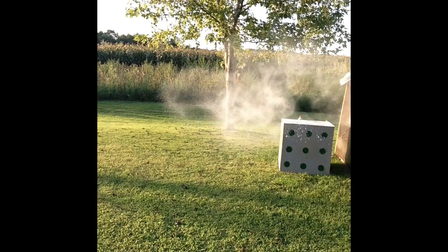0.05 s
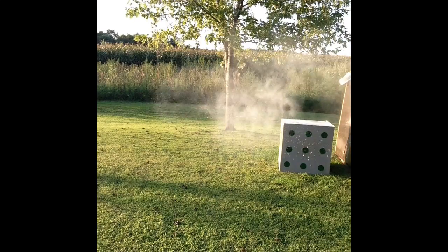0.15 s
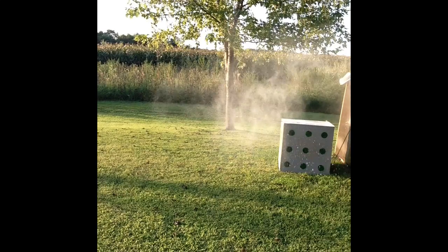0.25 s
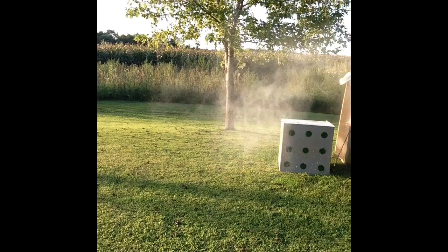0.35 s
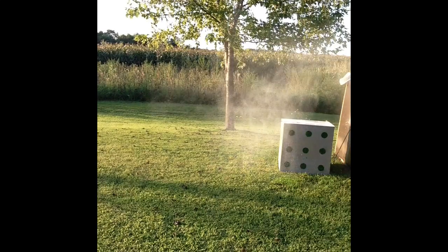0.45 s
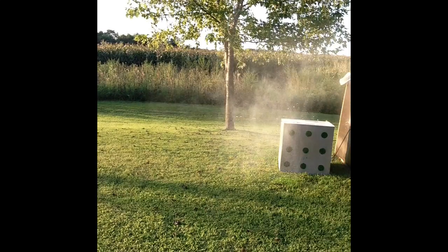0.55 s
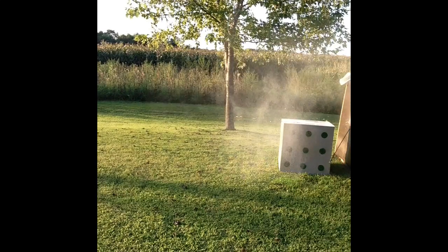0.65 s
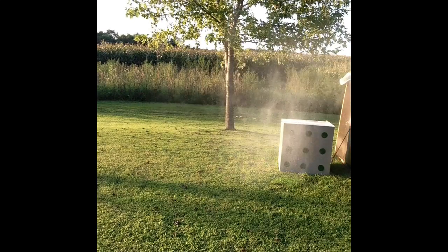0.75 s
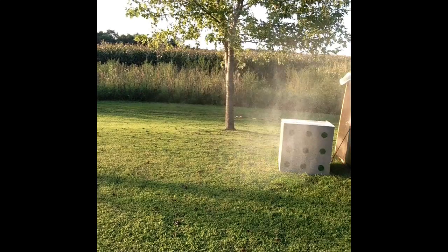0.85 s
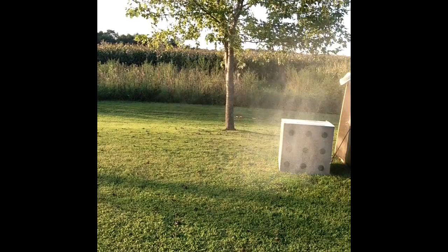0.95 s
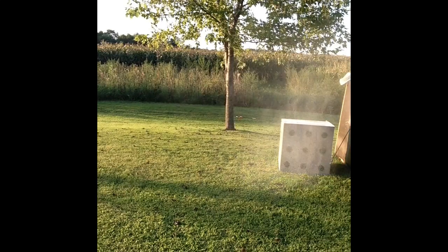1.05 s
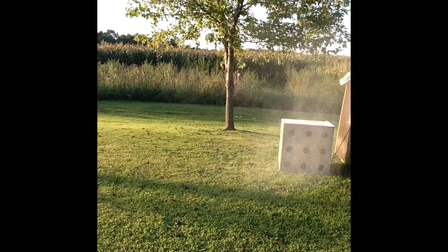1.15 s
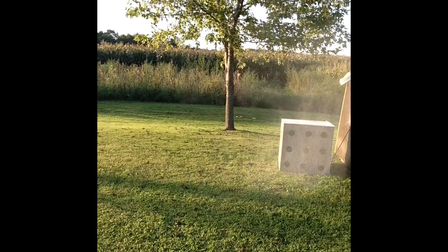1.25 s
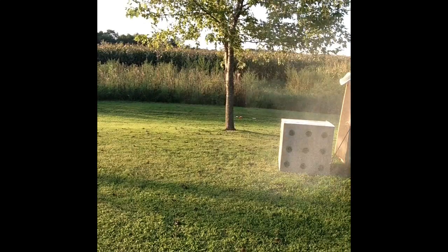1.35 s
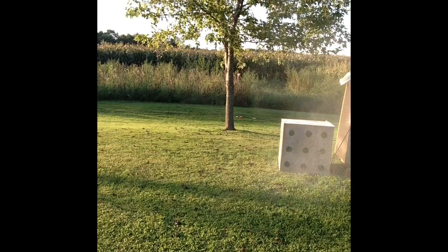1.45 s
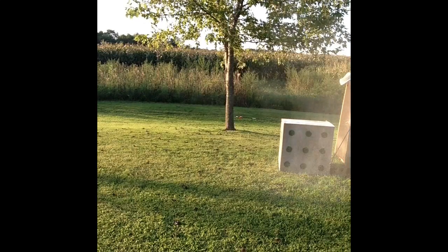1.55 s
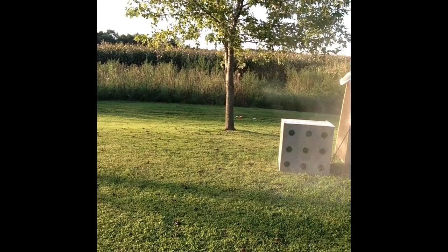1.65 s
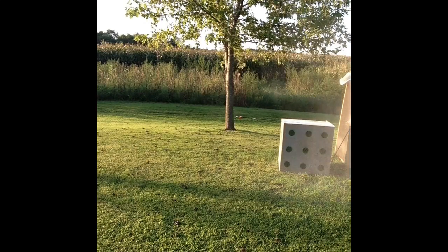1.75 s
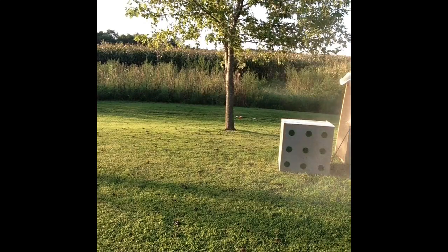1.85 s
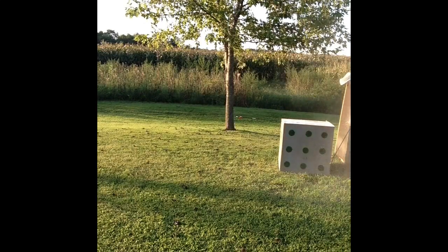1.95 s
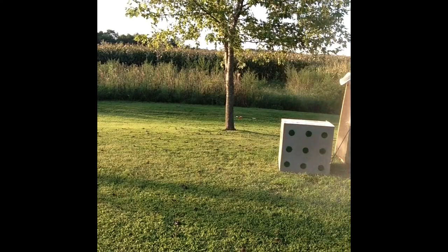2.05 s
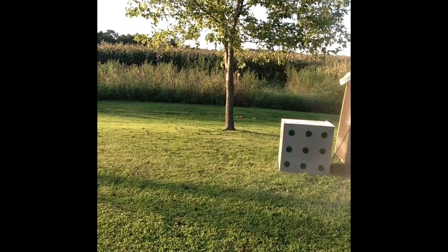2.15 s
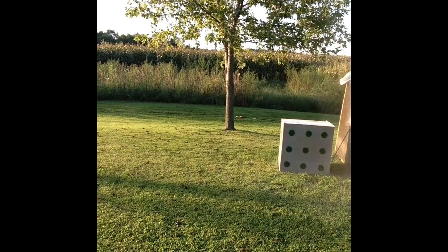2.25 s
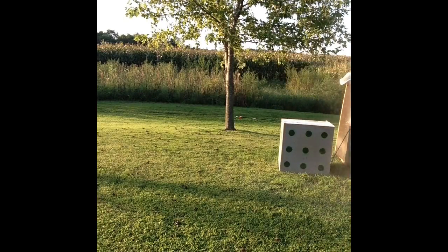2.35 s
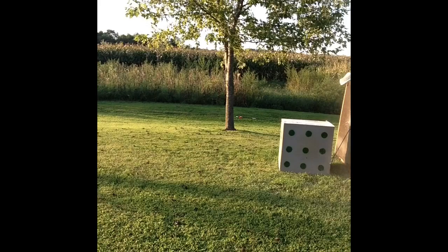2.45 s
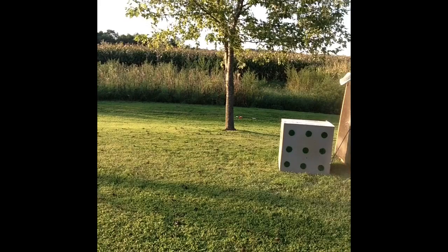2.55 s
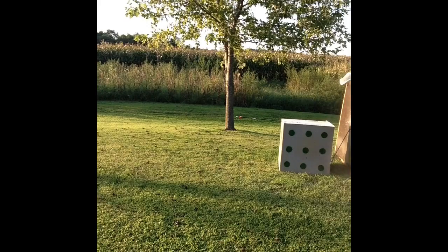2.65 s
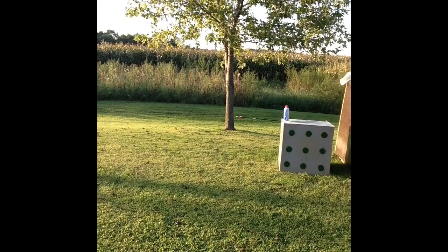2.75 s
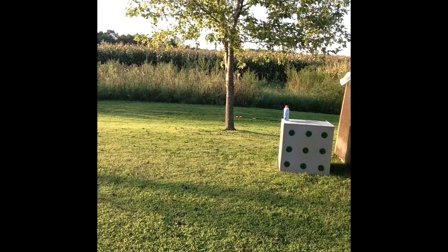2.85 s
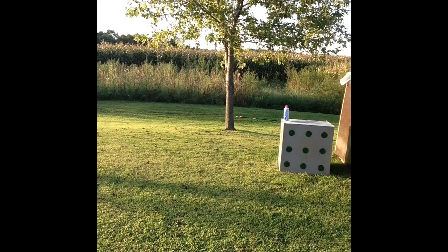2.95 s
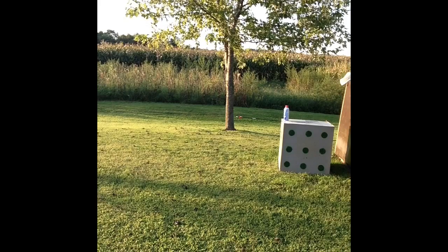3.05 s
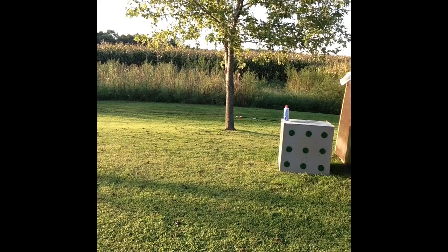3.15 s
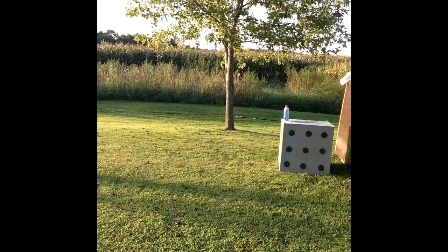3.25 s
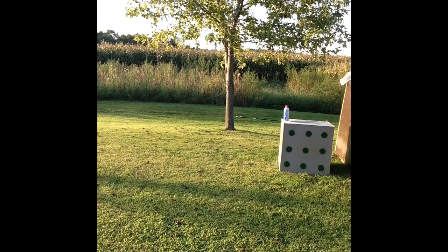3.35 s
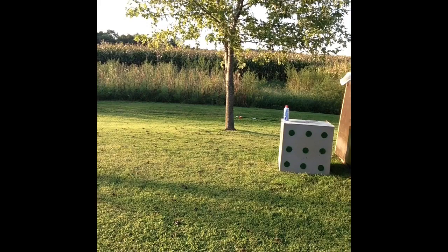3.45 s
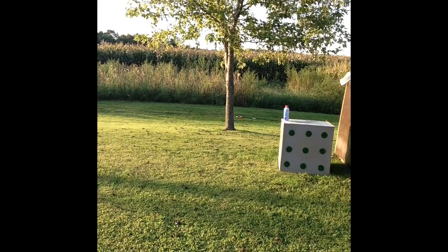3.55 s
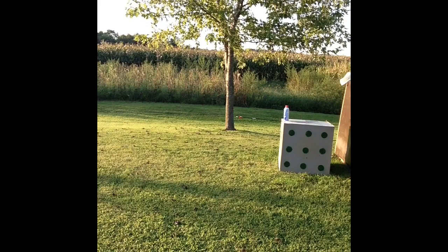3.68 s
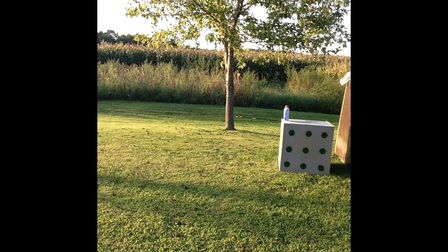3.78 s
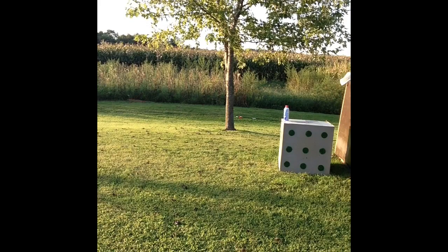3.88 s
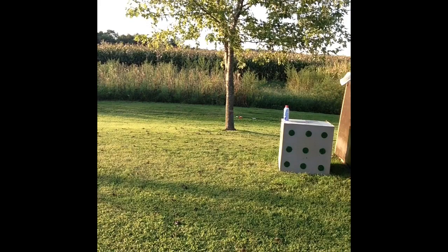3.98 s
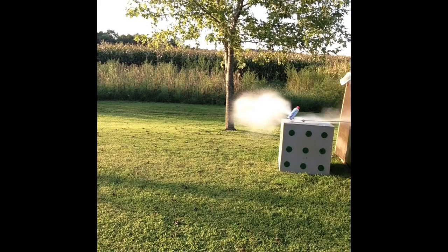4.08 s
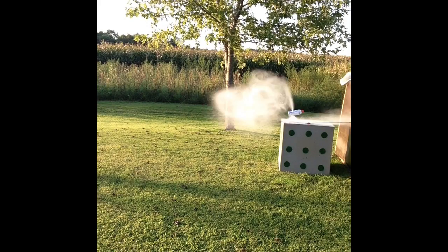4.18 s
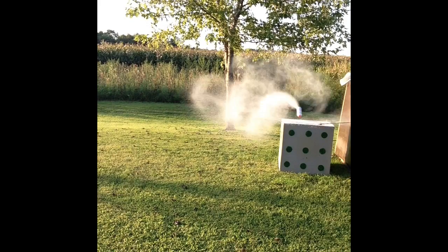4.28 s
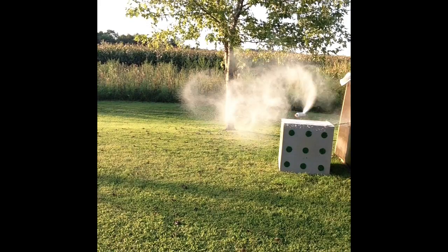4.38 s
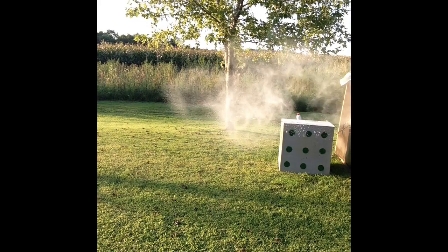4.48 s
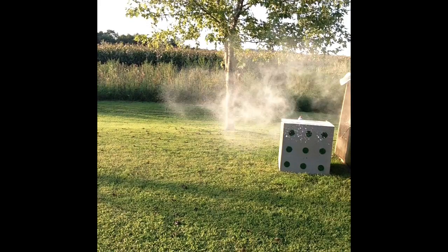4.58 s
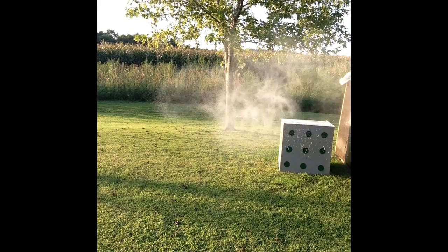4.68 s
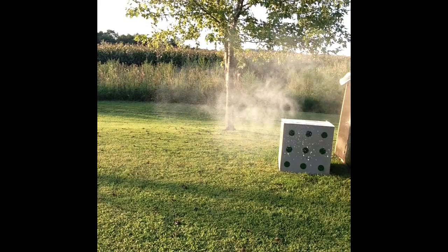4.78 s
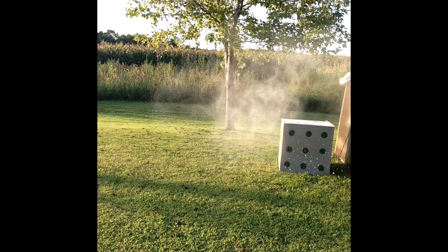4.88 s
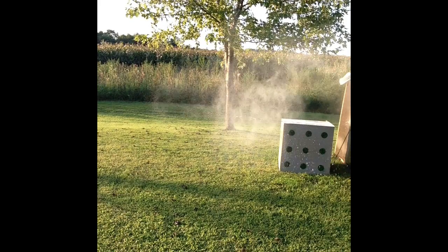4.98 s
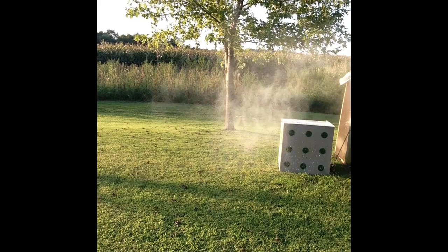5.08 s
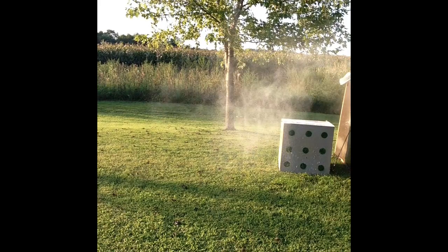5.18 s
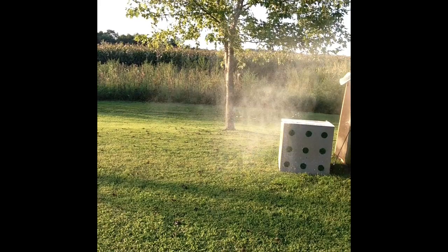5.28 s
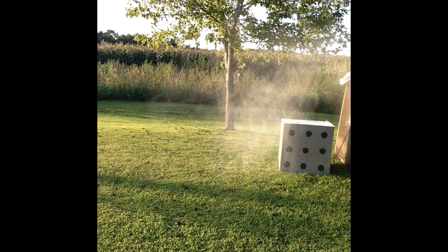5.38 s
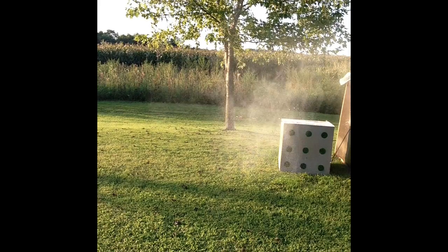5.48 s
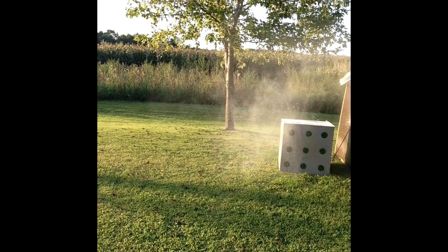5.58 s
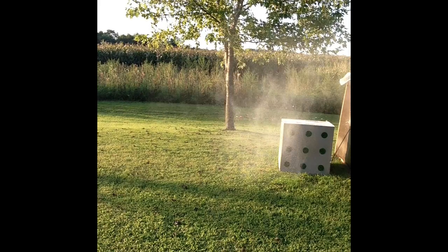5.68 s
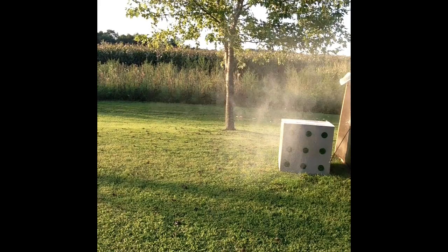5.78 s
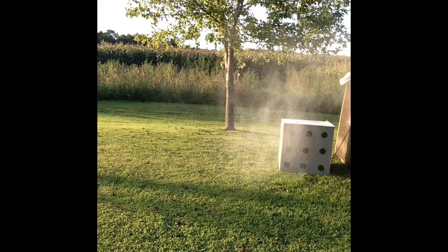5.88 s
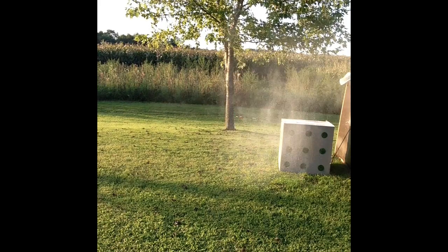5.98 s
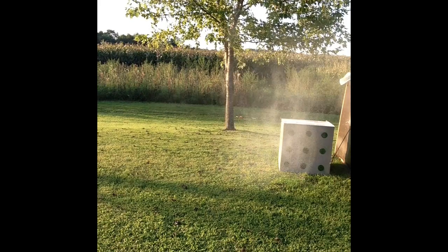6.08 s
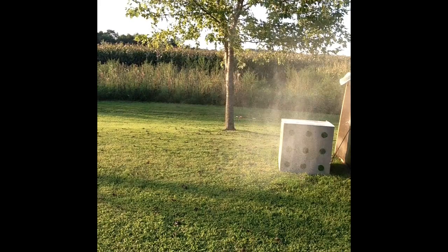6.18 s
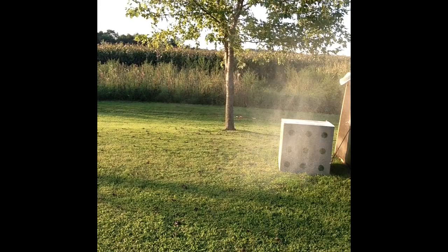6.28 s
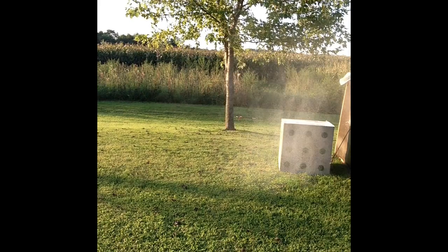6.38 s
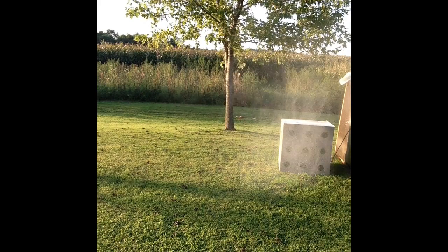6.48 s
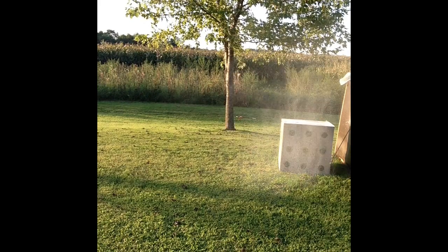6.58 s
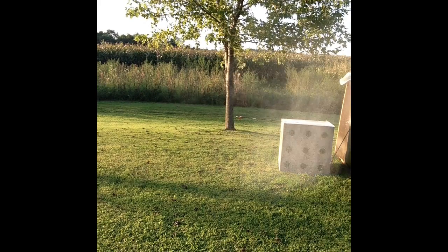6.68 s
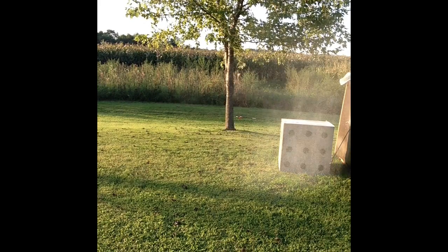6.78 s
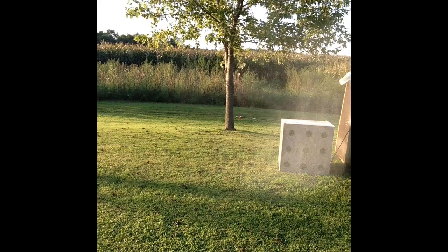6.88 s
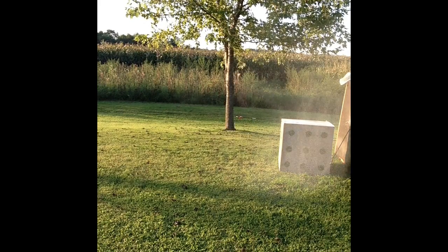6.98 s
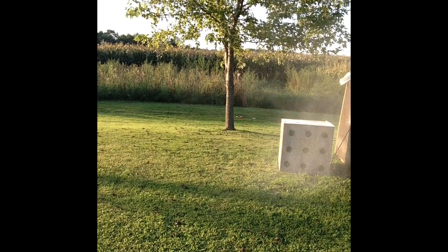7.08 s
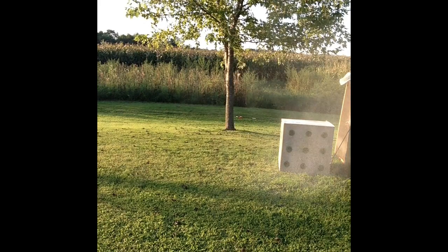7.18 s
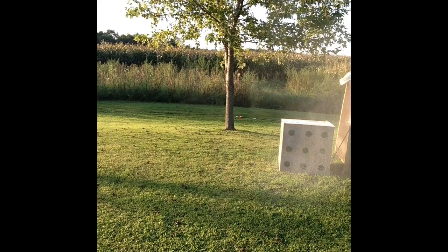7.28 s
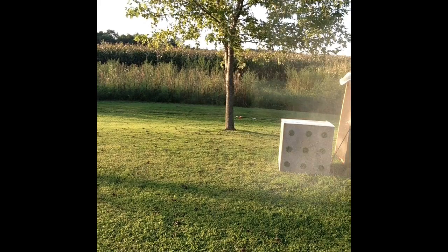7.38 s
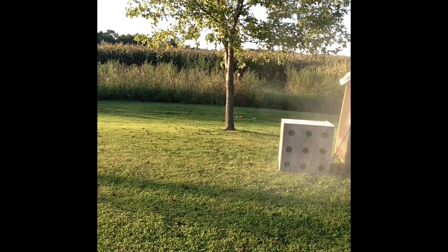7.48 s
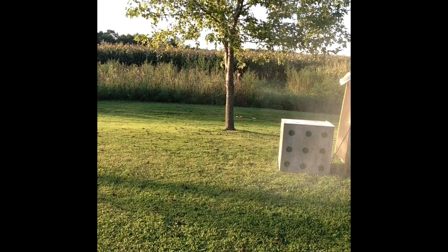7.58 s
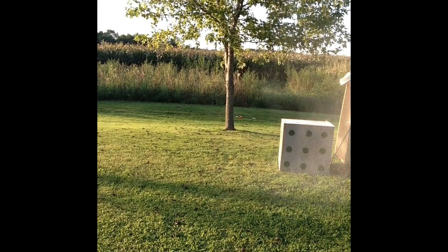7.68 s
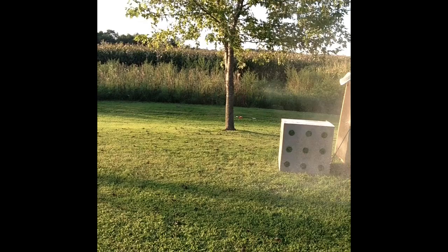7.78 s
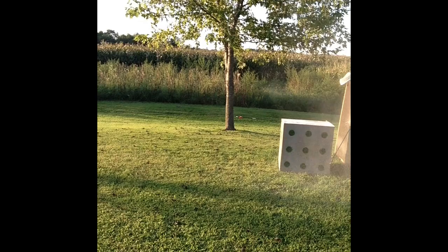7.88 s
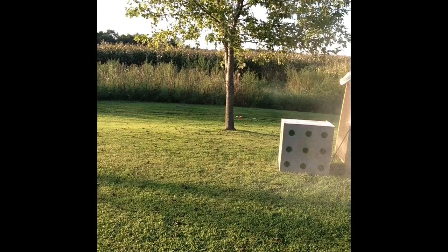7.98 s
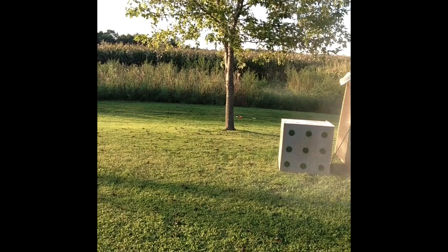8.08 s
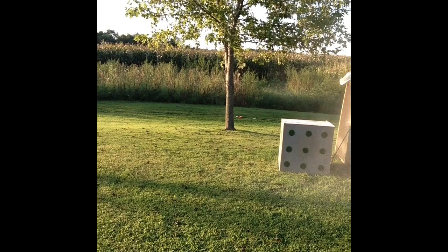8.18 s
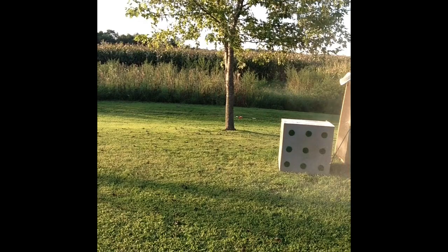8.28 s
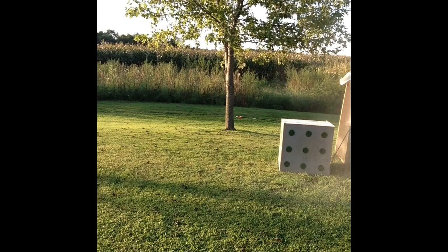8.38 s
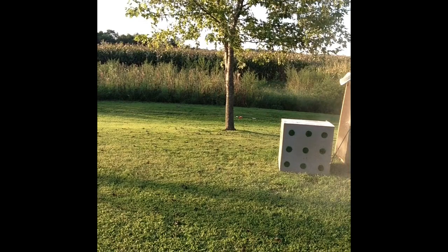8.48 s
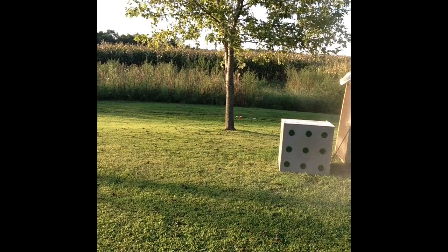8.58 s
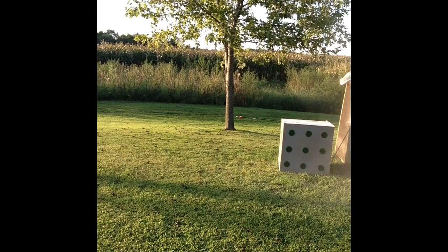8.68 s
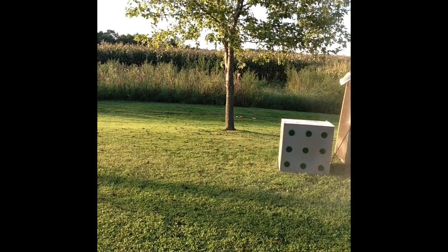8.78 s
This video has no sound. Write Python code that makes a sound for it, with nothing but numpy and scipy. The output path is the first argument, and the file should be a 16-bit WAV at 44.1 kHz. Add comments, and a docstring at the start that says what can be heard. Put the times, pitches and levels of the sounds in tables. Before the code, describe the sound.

Crickets chirr while gas hisses out; after a brief gap, a slowed bow twang ends in a violent metallic bang, rushing gas and soft can knocks.

```python
"""First the dying hiss of a burst pressure can is heard at natural speed, among crickets in a yard.
Then the whole shot plays at half speed: the bow snaps, the arrow hits, gas roars out and the can tumbles.
Hiss, air and insects are filtered noise; crickets, bird and bow are tones; struck things are fading rings.
All times and pitches below are those of the half-speed playing, on the clock of the whole yard.
"""
import sys
import numpy as np
from scipy import signal
from scipy.fft import rfft, irfft
from scipy.io import wavfile
from scipy.ndimage import uniform_filter1d

SR = 44100
rng = np.random.default_rng(int(sys.argv[2]) if len(sys.argv) > 2 else 0)


def boost_factor(decibels):
    """Convert a level in decibels to a linear amplitude factor."""
    exponent = np.asarray(decibels, float) / 20
    return 10 ** exponent


def store_wav(level_fs):
    """Save 16-bit WAV to argv[1]."""
    pcm = np.round(np.clip(np.atleast_2d(level_fs), -1, 1) * 32767)
    wavfile.write(sys.argv[1], SR, pcm.T.astype(np.int16))


N = 389403

LENGTH = round(10.1 * SR)  # samples of the yard
T = np.arange(LENGTH) / SR  # time in s
FIRST_BLOW_S = 4.111  # the arrow touches the can


def noise():
    """Plain white noise as long as the yard: every pitch equally strong."""
    return rng.standard_normal(LENGTH)


def evened(x):
    """Scales to rms 1, so that a level in dB can be set afterwards."""
    return x / np.sqrt(np.mean(x ** 2) + 1e-20)


def add(mix, s, sound):
    """Mixes a sound in at s seconds."""
    part = mix[round(s * SR):][:len(sound)]
    part += sound[:len(part)]


def coloured(x, points):
    """Filters x by a table of pitches and relative levels, then evens it."""
    f, db = np.transpose(points)
    hz = np.fft.rfftfreq(len(x), 1 / SR)
    curve_db = np.interp(np.log(hz + 1), np.log(f + 1), db)
    return evened(irfft(rfft(x) * boost_factor(curve_db), len(x)))


def level(rows):
    """Gain that follows a dB curve over time."""
    s, db = np.transpose(rows)
    return boost_factor(np.interp(T, s, db))


def humps(rows):
    """Gain of swells that rise to a peak and die away, added by power."""
    power = 0
    for s, db, rise, fall in rows:
        below_peak_db = np.maximum((s - T) * rise, (T - s) * fall)
        power = power + boost_factor(db - below_peak_db) ** 2
    return np.sqrt(power)


def resonate(x, hz, width):
    """A steep resonance: shift the pitch down to zero, smooth twice, shift back."""
    turn = np.exp(2j * np.pi * hz * T)
    r = np.exp(-np.pi * width / SR)
    smooth = signal.lfilter([1], np.convolve([1, -r], [1, -r]), x / turn)
    return (turn * smooth).real


def wobble(seconds):
    """Slow chance ups and downs of rms 1, from noise smoothed twice."""
    size = max(round(seconds * SR), 1)
    return evened(uniform_filter1d(uniform_filter1d(noise(), size), size))


def struck(blows, modes, ring=1):
    """A hit body sounds at its own pitches (modes); each blow rings those nearest its aim the most."""
    reach_db_per_octave = 70  # how narrowly a blow picks its modes
    rows = []
    for s, db, aim_hz in blows:
        for hz, t60 in modes:
            miss_db = reach_db_per_octave * abs(np.log2(hz / aim_hz))
            rows.append((s, db - miss_db, hz, ring * t60))
    return rows


def knocks(rows, rise):
    """Each row is a damped ring that swells for a share (rise) of its t60 and sags a little in pitch."""
    out, t = np.zeros(LENGTH), T[:SR // 2]
    for s, db, hz, t60 in rows:
        swell = np.sin(np.pi / 2 * np.minimum(t / (rise * t60), 1)) ** 2
        decay = boost_factor(db - 60 * np.maximum(t / t60 - rise, 0))
        turns = hz * (t + .03 * t60 * (1 - np.exp(-t / (0.74 * t60))))
        add(out, s, swell * decay * np.sin(2 * np.pi * turns))
    return out


# Colour of far traffic and leaves: [f/Hz, relative level/dB]
AIR_COLOUR = [(24, -42), (40, -11), (92, 0.5), (275, -6.5), (302, -6.5), (671, -10), (937, -12.5),
              (1610, -16), (1800, -15), (2340, -37), (3960, -120)]


def quiet_air():
    """Far traffic and leaves blend into a soft, low noise."""
    return boost_factor(-77) * coloured(noise(), AIR_COLOUR)


# Colour of the far cricket hiss: [f/Hz, relative level/dB]
CHORUS_COLOUR = [(1030, -64.5), (1750, -36), (1900, -19.5), (2240, -8), (2720, -8.5), (3020, -20),
                 (3750, -0.5), (3990, -7.5), (4760, -23.5), (6020, -17), (7600, -21), (9880, -54.5),
                 (16700, -120)]
# Bands of it that swell on their own: [f/Hz, width/Hz, level/dB over the yard level]
CHORUS_BANDS = [(2187, 51, -12.5), (2347, 300, -7), (2700, 230, -13), (2767, 30, -15), (3460, 250, -9),
                (3910, 300, -9.5), (3999, 810, -5.5), (4480, 330, -16.5)]


def chorus():
    """Countless far crickets blur to hiss, in bands that each swell on their own."""
    out = coloured(noise(), CHORUS_COLOUR)
    for hz, width, db in CHORUS_BANDS:
        band = evened(resonate(noise(), hz, width))
        out += boost_factor(db + 1.7 * wobble(0.033)) * band
    return out


# Beat of each near cricket voice: [f/Hz, pulses per s, place of the pulse in the cycle 0-1]
CRICKET_BEATS = [(1944, 26.29, .14), (3862, 13.95, .77), (3862, 13.95, .5), (3648, 7.43, .08),
                 (3648, 7.43, .33)]
# Its wing scrapes, row by row: [pulse length/s, level/dB over the yard level, pitch scatter/Hz]
CRICKET_WINGS = [(0.028, -7.5, 9.6), (0.034, 5, 6), (0.033, -7.5, 8), (0.041, 5, 9), (0.019, 4.5, 8)]


def crickets():
    """Each wing scrape is a short tone, repeated in nearly steady time, uneven in strength."""
    out = np.zeros(LENGTH)
    for (hz, rate, place), (length, db, scatter) in zip(CRICKET_BEATS, CRICKET_WINGS):
        cycles = T * rate + .04 * wobble(.1) - place
        away_s = ((cycles + .5) % 1 - .5) / rate  # time from the middle of the nearest pulse
        pulse = np.cos(np.pi * np.clip(away_s / length, -.5, .5))
        tone = np.sin(2 * np.pi * np.cumsum(hz + scatter * wobble(0.012)) / SR)
        out += boost_factor(db + 1.3 * wobble(0.028)) * pulse * tone
    return out


# The yard level of chorus and crickets, fainter for a while after the bang: [t/s, level/dB]
YARD_LEVEL = [(2.8, -57), (4.1, -55), (4.9, -60.5), (5.6, -58.5), (7, -58), (8.5, -57), (10.1, -57)]


def all_crickets():
    """Far and near crickets share one slowly changing loudness."""
    return level(YARD_LEVEL) * (chorus() + crickets())


# Raspy insects that swell on their own: [t/s, level/dB]
RASP_LEVEL = [(2.8, -69), (3.5, -65.5), (4.1, -64.5), (5, -71), (6.5, -73), (7.3, -69.5), (7.9, -64),
              (8.7, -62), (10.1, -63)]
# Their colour: [f/Hz, relative level/dB]
RASP_COLOUR = [(4500, -31), (5200, -7), (6000, -3), (6700, 0.5), (7100, -5), (7600, -14.5)]


def rasp():
    """Fine dense scraping high up: bright noise that flickers in strength."""
    flicker = boost_factor(1.5 * wobble(.012))
    return level(RASP_LEVEL) * flicker * coloured(noise(), RASP_COLOUR)


# Bird notes, mostly a low one answered by a higher one: [t/s, length/s, level/dB, end f/Hz]
BIRD_NOTES = [(3.853, 0.05, -59.5, 1295), (3.92, 0.035, -65, 1480), (6.422, .04, -66, 1200),
              (6.49, .058, -72, 1465), (7.94, 0.052, -59.5, 1300), (8.02, .07, -71, 1480),
              (8.215, 0.048, -62, 1430), (8.36, .05, -64, 1480), (9.685, .06, -68, 1250),
              (9.775, .04, -72, 1420)]


def bird():
    """Rising whistles, one clear echo and a smear of echoes from the trees."""
    dry = np.zeros(LENGTH)
    for s, length, db, end_hz in BIRD_NOTES:
        u = np.arange(0, 1, 1 / (length * SR))
        hz = end_hz * (1 - .18 * (1 - u) ** 2.4)  # starts 18 % below its end pitch
        whistle = np.sin(2 * np.pi * np.cumsum(hz) / SR)
        add(dry, s, boost_factor(db) * np.sin(np.pi * u) * whistle)
    trees = rng.standard_normal(SR // 2) * boost_factor(-60 * T[:SR // 2] / 0.74)
    trees = trees / np.linalg.norm(trees)
    echo = np.roll(dry, round(.085 * SR))
    smear = signal.oaconvolve(dry, trees)[:LENGTH]
    return dry + boost_factor(-20) * echo + boost_factor(-5.5) * smear


# Snaps of the string and limbs: [t/s, level/dB at the aimed pitch, most excited f/Hz]
SNAPS = [(3.522, -44.5, 1540), (3.525, -37, 565), (3.525, -43, 2580), (3.53, -55, 750), (3.538, -36, 2580),
         (3.54, -38.5, 465), (3.553, -50, 750), (3.567, -46, 465)]
# Short rings of string and limbs: [f/Hz, t60/s = time to fall by 60 dB]
SNAP_MODES = [(465, 0.025), (565, .017), (750, 0.025), (1540, 0.02), (2580, 0.013)]
# Long ring of the bow; f is its starting pitch: [f/Hz, level/dB, t60/s]
BOW_RING = [(290, -68.5, 1.8), (387, -57, 0.4), (492, -56, 3.4), (726, -56.5, 0.93)]
# Limb rattle, a tick, the snap and its tail: [peak t/s, level/dB, rise/(dB per s), fall/(dB per s)]
BOW_RATTLE = [(3.48, -64.5, 1000, 450), (3.523, -50.5, 1800, 160), (3.62, -65, 300, 40.5)]
# Colour of that rattle: [f/Hz, relative level/dB]
BOW_RATTLE_COLOUR = [(59, -34), (100, -31.5), (223, -14), (470, 2), (745, -1), (1150, -10.5), (1570, 1.5),
                     (3500, -18.5), (4550, -27.5), (7700, -120)]


def bow():
    """Snaps, rattling noise, and a long ring of limbs and string that sags as it slackens."""
    out = knocks(struck(SNAPS, SNAP_MODES), rise=0.092)
    t = T[:SR]
    turns = t - 0.034 * t ** 2 - 0.083 * t ** 4  # ever slower: the pitch sags
    stop = np.clip((.55 - t) / 0.22, 0, 1)
    ring = np.zeros(SR)
    for hz, db, t60 in BOW_RING:
        strength = boost_factor(db - 60 * t / t60 + 2.4 * wobble(0.018)[:SR])
        ring += strength * np.sin(2 * np.pi * hz * turns)
    add(out, SNAPS[1][0], stop * ring)
    return out + humps(BOW_RATTLE) * coloured(noise(), BOW_RATTLE_COLOUR)


# Colour of the nearing arrow: [f/Hz, relative level/dB]
RUSH_COLOUR = [(59, -40), (100, -5.5), (217, -22), (494, -1.5), (652, -8), (983, -3), (1800, -7),
               (2340, -41.5), (3960, -120)]


def arrow_rush():
    """The arrow's rush is noise that grows as it nears and stops at contact."""
    contact_db, loss_db_per_s2 = -58, 209  # the loss goes with the square of the time to go
    near = boost_factor(contact_db - loss_db_per_s2 * (FIRST_BLOW_S - T) ** 2) * (T < FIRST_BLOW_S)
    return near * coloured(noise(), RUSH_COLOUR)


# The bang returning from the far field edge, then its long tail:
# [peak t/s, level/dB, rise/(dB per s), fall/(dB per s)]
FIELD_ECHO = [(5.25, -56.5, 27.5, 43), (5.8, -73.5, 40, 31)]
# Colour of that echo: [f/Hz, relative level/dB]
ECHO_COLOUR = [(250, -17.5), (600, -9.5), (1200, -5.5), (2500, -6), (4500, -21)]


def field_echo():
    """The late echo is so blurred that swells of filtered noise stand for it."""
    return humps(FIELD_ECHO) * coloured(noise(), ECHO_COLOUR)


# Air pushed past the microphone: [peak t/s, level/dB, rise/(dB per s), fall/(dB per s)]
BUFFETS = [(4.125, -42, 1499.5, 33), (4.168, -21.5, 501, 352.5), (4.25, -38.5, 151, 505),
           (4.332, -28.5, 592.5, 898), (4.44, -46, 349.5, 42.5)]


def buffeting():
    """Pushed air thumps at the microphone: swells of low noise around 105 Hz."""
    low = evened(resonate(noise(), 105, 110))
    return humps(BUFFETS) * (T > FIRST_BLOW_S) * low


# The can rolling over on the grass: [t/s, ground thud level/dB, can rattle level/dB]
GRASS_CONTACTS = [(5.044, -95, -59), (5.09, -58, -59), (5.14, -51.5, -55.5), (5.178, -59.5, -75),
                  (5.278, -61.5, -66), (6.322, -64, -75), (6.382, -53, -68), (6.436, -64, -67),
                  (6.5, -60, -72), (6.572, -70, -79)]
# Pitches of the can that rattle: [f/Hz, width/Hz, relative level/dB]
CAN_RATTLE = [(186, 130, -4), (334, 76, 7.5), (560, 160, -6)]


def tumble():
    """Uneven contact with the grass thuds low and shakes the modes of the can."""
    thud = evened(resonate(noise(), 114.0, 47))
    contact = noise()
    rattle = np.zeros(LENGTH)
    for hz, width, db in CAN_RATTLE:
        rattle += boost_factor(db) * evened(resonate(contact, hz, width))
    # the last two numbers are rise and fall in dB per s
    thud_gain = humps([(s, db, 400, 304) for s, db, _ in GRASS_CONTACTS])
    rattle_gain = humps([(s, db, 500, 300) for s, _, db in GRASS_CONTACTS])
    return thud_gain * thud + rattle_gain * evened(rattle)


# The arrow's first blow rings the can wall: [t/s after contact, level/dB, f/Hz, t60/s]
PUNCTURE = [(0, -8, 650, .015), (0.00047, -2.5, 1880, .014), (0, -11, 1100, 0.01094), (0, -12, 860, .011),
            (0, -16.5, 3200, 0.00993), (0.015, -27, 5000, 0.013), (0.0049, -22.5, 3400, .012)]
# Blows on can and block, and the can's first bounces:
# [t/s, level/dB at the aimed pitch, most excited f/Hz]
BLOWS = [(4.132, -15, 1980), (4.139, -7, 799), (4.144, -6, 495), (4.1459, -5.5, 1510), (4.156, -1, 343),
         (4.164, -9.5, 230), (4.168, -18, 153), (4.173, -9, 990), (4.207, -9.5, 914), (4.27, -11, 495),
         (5.033, -43, 343), (5.036, -44, 560), (5.039, -49, 990), (5.04, -54, 1510), (5.078, -60, 392),
         (5.1, -55, 343), (5.115, -43.5, 392), (5.135, -48.5, 343), (5.142, -42, 560), (5.15, -50, 680),
         (5.153, -57, 1510)]
# Soft knocks of the empty can lying loose: [t/s, level/dB at the aimed pitch, most excited f/Hz]
LOOSE_KNOCKS = [(5.082, -54.5, 119), (5.72, -70, 680), (6.356, -53, 119), (6.367, -61, 343),
                (6.41, -68, 343), (6.46, -61, 370), (6.48, -70, 119)]
# Modes of can and block together; t60 is for the blows, before the can lies loose: [f/Hz, t60/s]
CAN_MODES = [(119, 0.04), (152.7, 0.055), (230.3, .04), (343.4, .039), (392, .035), (495.5, .03),
             (560, 0.018), (680, 0.024), (799, 0.0081), (914, .018), (990, 0.012), (1510, 0.0073),
             (1980, 0.00974)]


def can():
    """The puncture, the blows that follow and the loose knocks are short rings of metal and foam."""
    puncture = knocks([(FIRST_BLOW_S + late, *row) for late, *row in PUNCTURE], rise=0.18)
    blows = knocks(struck(BLOWS, CAN_MODES), rise=0.098)
    # lying loose, the can rings 3 times as long
    loose = knocks(struck(LOOSE_KNOCKS, CAN_MODES, ring=3), rise=0.25)
    return puncture + blows + loose


# Gas bursts, at the puncture, at the tearing of the wall, and the last seep:
# [peak t/s, level/dB, rise/(dB per s), fall/(dB per s)]
GAS_PUFFS = [(4.113, -13, 2700, 902.5), (4.168, -14, 349, 700), (4.9, -54.5, 63, 39)]
# Colour of the gas at high pressure: [f/Hz, relative level/dB]
JET_FULL = [(59, -39), (100, -8), (226, -13), (434, -3.5), (708, -5), (929, 2), (1070, -3), (1540, -4),
            (2610, -8.5), (4920, -14), (7600, -27), (9880, -58), (16700, -120)]
# Colour of the gas at low pressure: [f/Hz, relative level/dB]
JET_THIN = [(59, -31.5), (100, -11.5), (230, -36.5), (286, -9), (520, -10), (683, -5), (804, -10.5),
            (1020, -4), (1820, -5), (4100, -1.5), (7600, -14), (9880, -52), (16700, -120)]


def jet():
    """Escaping gas is turbulent hiss with spits of liquid; high pressure sounds fuller and crackles more."""
    # pressure on a scale of 0-1: held at first, then falling to a rest value
    hold_s, fall_s, pressure_start, pressure_rest = .11, .16, .9, 0.12
    late = np.maximum(T - FIRST_BLOW_S - hold_s, 0)
    pressure = pressure_rest + (pressure_start - pressure_rest) * np.exp(-late / fall_s)
    # the steady outflow sags evenly, then collapses as the can runs empty
    outflow_s, outflow_db, rise_db_per_s, sag_db_per_s = 4.151, -16.5, 501.5, 20
    emptying_db_per_s3 = 62
    emptying = boost_factor(-emptying_db_per_s3 * np.maximum(T - outflow_s, 0) ** 3)
    outflow = humps([(outflow_s, outflow_db, rise_db_per_s, sag_db_per_s)]) * emptying
    gain = np.hypot(outflow, humps(GAS_PUFFS)) * (T > FIRST_BLOW_S)
    # about 1500 single clicks a second, of very uneven strength
    spit_size = boost_factor(2.9 * np.minimum(rng.exponential(1, LENGTH), 4))
    spits = spit_size * noise() * (rng.random(LENGTH) < 1500 / SR)
    turbulence = noise() * boost_factor(0.79 * wobble(.004) + 0.59 * wobble(0.017))
    flow = turbulence + 0.54 * pressure * evened(spits)
    full = coloured(flow, JET_FULL)
    thin = coloured(flow[::-1], JET_THIN)  # played backwards, so that it does not line up with full
    return gain * (np.sqrt(pressure) * full + np.sqrt(1 - pressure) * thin)


def scene():
    """Plays the yard twice: first a late part sped up by two, then as written, with a quick fade between."""
    background = quiet_air() + all_crickets() + rasp() + bird()
    shot = bow() + arrow_rush() + field_echo() + buffeting() + tumble() + can() + jet()
    # the microphone's bass cut
    bass_cut = signal.butter(3, 75, "high", fs=SR, output="sos")
    yard = signal.sosfilt(bass_cut, background + shot)
    yard = np.tanh(yard ** 3 / 3 + yard) * .97  # the loudest peaks saturate softly
    treble_cut = signal.firwin(2001, 7635, window=("kaiser", 9), fs=SR)
    yard = signal.oaconvolve(yard, treble_cut, "same")
    slow_from_s, fast_from_s, fade_out_s, fade_in_s = 2.829, 4.3702, .03, .02
    cut = round(slow_from_s * SR)
    fast = yard[round(fast_from_s * SR)::2][:cut]  # every second sample: double speed
    out = np.r_[fast, yard[cut:N]]
    t = T[:N] - slow_from_s
    fade = np.clip(np.maximum(-t / fade_out_s, t / fade_in_s), 0, 1)
    return (out * fade)[None]


def top_cut(x):
    """Nothing passes above the cut-off."""
    return signal.sosfilt(signal.butter(12, 15470, fs=SR, output="sos"), x)


def record(dry):
    """Adds a trace of circuit hiss and returns the finished sound."""
    hiss = boost_factor(-101) * rng.standard_normal(dry.shape)
    return top_cut(dry + hiss)


dry = scene()
out = record(dry)
store_wav(out)
```